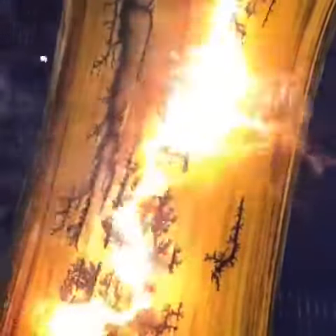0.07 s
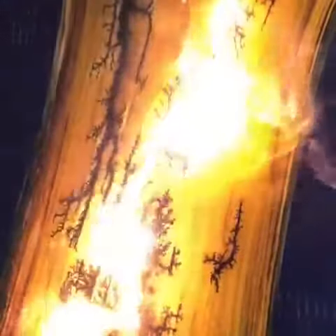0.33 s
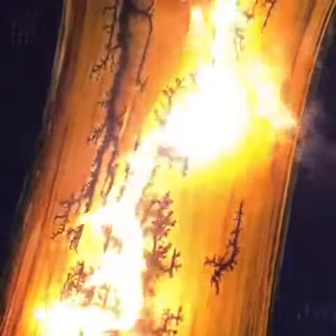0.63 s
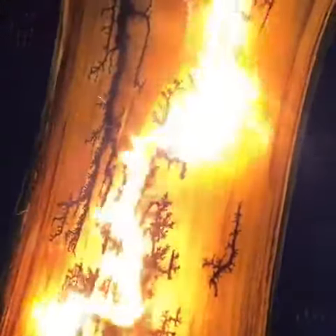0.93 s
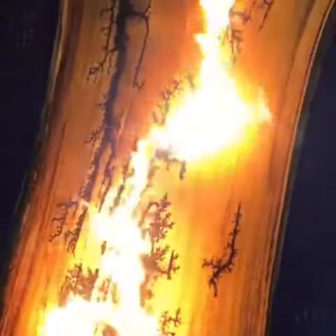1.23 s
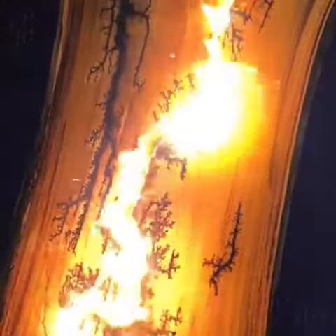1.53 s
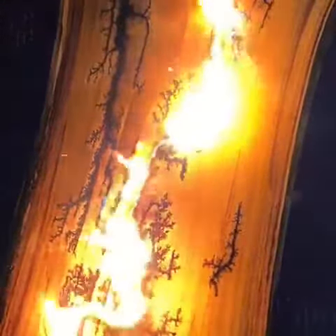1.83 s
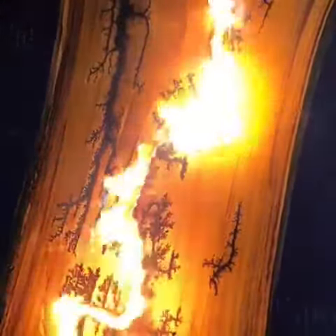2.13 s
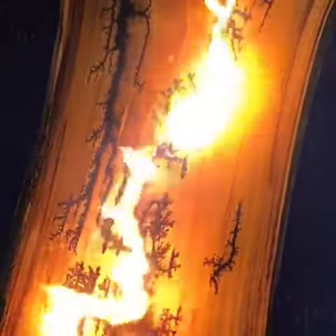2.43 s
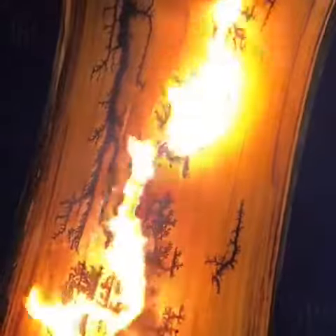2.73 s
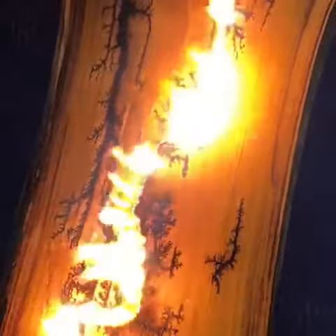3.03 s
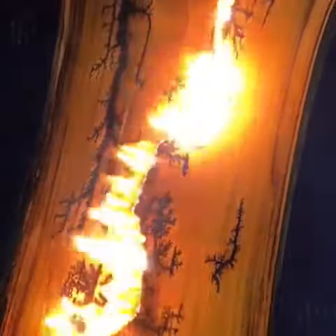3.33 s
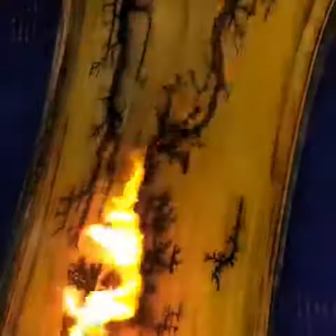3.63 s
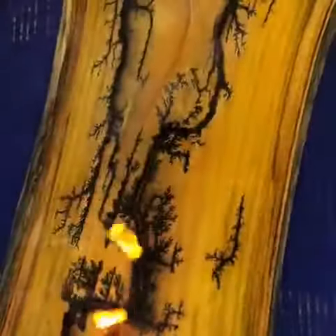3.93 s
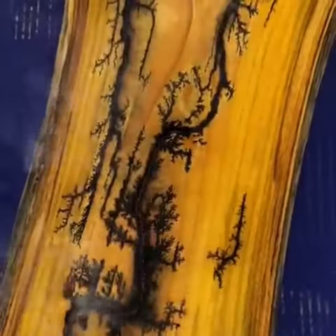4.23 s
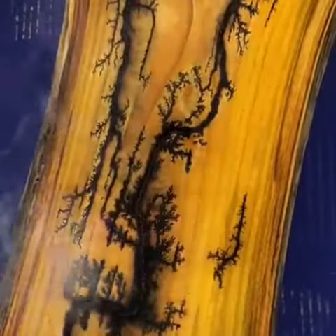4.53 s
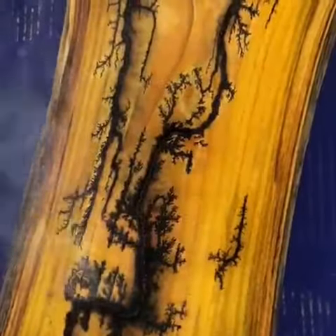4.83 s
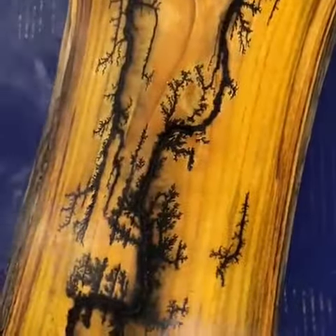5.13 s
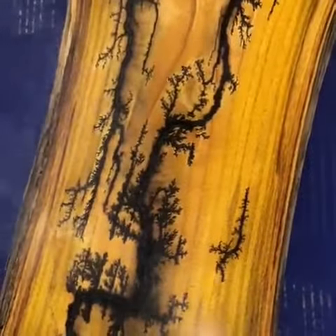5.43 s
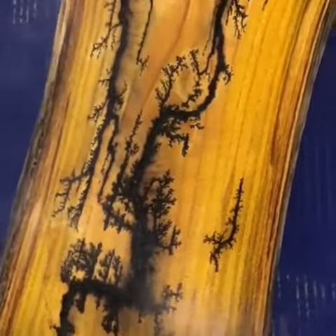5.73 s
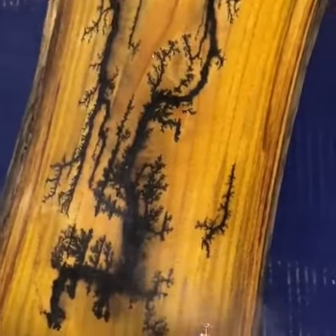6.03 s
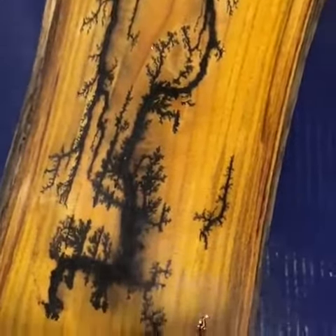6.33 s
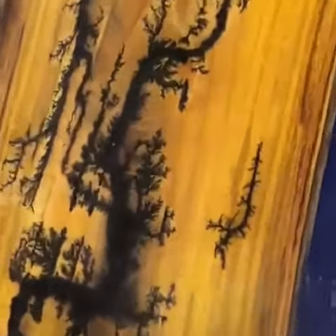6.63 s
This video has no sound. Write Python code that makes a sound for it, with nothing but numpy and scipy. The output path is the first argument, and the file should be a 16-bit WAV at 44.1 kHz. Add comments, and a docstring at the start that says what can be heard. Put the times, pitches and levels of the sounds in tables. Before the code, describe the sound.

An electric arc cracks hard, then settles into a rasping buzz with irregular sharp spikes as it scorches wood near the microphone. A loud snap cuts it off, and a dull knock gives way to steady mains hum. After a low thump, steam spits and fizzes for about a second, then simmers faintly. Low workshop air and a thin fan whine lie underneath.

```python
"""An electric arc, fed by a high-voltage mains transformer, burns along a charred track in a plank close by.
It strikes with a crack once every mains cycle and sizzles in its flame, then blows out with a loud snap.
The transformer hums on idle; then, with a thump and a spit, current finds damp wood and steam hisses.
Low workshop air and the whine of a cooling fan lie underneath."""
import sys
import numpy as np
from scipy import signal
from scipy.fft import rfft, irfft
from scipy.io import wavfile
from scipy.ndimage import uniform_filter1d

SR = 44100
rng = np.random.default_rng(int(sys.argv[2]) if len(sys.argv) > 2 else 0)


def dump(signal):
    """Clip the signal to [-1, 1] and save it as 16-bit WAV at the path in sys.argv[1]."""
    limited = np.clip(np.atleast_2d(signal).T, -1, 1)
    pcm = np.round(limited * 32767).astype(np.int16)
    wavfile.write(sys.argv[1], SR, pcm)


N = 303408
T = np.arange(N) / SR
MAINS_HZ = 49.975
ARC_OUT_S, STEAM_ON_S, STEAM_OFF_S = 3.625, 4.79, 5.88
SOFT_DB, SOFT_PHASE = -20, .732  # a soft strike, and the share of the mains cycle at which it fires

# The arc cracks hard in the cold gap, softens in its flame, then bites into fresh wood in surges:
# t/s, relative level/dB, tilt/(dB per octave)
ARC_CONTOUR = [(0, -11, -3), (0.15, -8.5, -1.8), (0.4, -11, -3.5), (0.52, -22.5, -6.5), (0.72, -21.5, -6.5),
               (1.07, -20, -3.5), (1.5, -19.5, -6), (1.67, -19.5, -0.5), (1.85, -21, -6.5),
               (2.07, -19.5, 1), (2.25, -22, -1.5), (2.45, -18.5, -1.5), (2.56, -21, 2.5), (2.8, -20, -0.5),
               (3.3, -21.5, -0.1), (3.55, -16, -2)]
# Cracks that stand out of the buzz; the last one blows the arc out:
# t/s, relative level/dB, tilt/(dB per octave), spatter/dB
ACCENT_CRACKS = [(0.0363, -9, -0.5, -4), (0.0763, -2, 1.5, 3), (0.1361, -6.5, 1, -9),
                 (0.1958, -8.5, -0.3, -5), (0.2563, -7.5, -4, -4), (0.2958, -4, -2, -1),
                 (1.2953, -13.5, -4, -10), (1.7361, -13, 0, -4), (2.0161, -13, -1.5, -9),
                 (2.1556, -13, 3, -1), (2.2361, -12.5, -4, -3), (2.356, -13, -1, -6),
                 (2.5561, -10, 2.5, -14), (2.5754, -14, 4, -15), (2.636, -11, 1.5, -13),
                 (2.6762, -9.5, 0.5, -5), (2.7167, -11.5, 2.5, -5), (2.8364, -12, -0.3, -9),
                 (3.0369, -8, 0, -5), (3.1363, -14, -1, -4), (3.3766, -12.5, 2.1, -12),
                 (3.4172, -6.5, 0, -4), (3.497, -11.5, -2.5, -8), (3.598, -6.5, 0.5, -9),
                 (3.6196, 3, 0.4, -11)]
def arc_strikes(buzz_gain_db=2, accent_gain_db=1, extra_tilt=.93, size=2048):
    """The gas breaks down once a mains cycle: late, hard and clean, or early, soft and frayed."""
    cycles = np.arange(int(ARC_OUT_S * MAINS_HZ))
    levels, tilts = curve(ARC_CONTOUR, (cycles + SOFT_PHASE) / MAINS_HZ)
    kick, tilt_jitter, spatter_jitter = rng.standard_normal((len(cycles), 3)).T
    force = np.clip(kick - .35 * np.roll(kick, 1), -2, 1)  # hot gas from a hard strike weakens the next
    scatter_db = 1.74 + .65 * cycles / MAINS_HZ  # more uneven as the track burns away
    levels = levels + scatter_db * force
    times = (cycles + breakdown_phase(levels)) / MAINS_HZ
    spatters = -5.5 - 2 * force + 1.6 * spatter_jitter
    buzz = np.column_stack([times, levels + buzz_gain_db, tilts + 1.3 * tilt_jitter, spatters])
    accents = np.array(ACCENT_CRACKS) + [0, accent_gain_db, 0, 0]
    clear_of_accents = np.abs(times[:, None] - accents[:, 0]).min(axis=1) > .5 / MAINS_HZ
    out = np.zeros(N + size)
    for at_s, db, tilt, spatter_db in np.vstack([buzz[clear_of_accents], accents]):
        start = int(at_s * SR)
        out[start:start + size] += amp(db) * crack(tilt + extra_tilt, spatter_db, size)
    return out[size // 8:][:N]


def breakdown_phase(level_db):
    """Share of the mains cycle at which the gas gives way; a harder strike waits for more voltage."""
    return SOFT_PHASE + .0065 * (level_db - SOFT_DB)


# Tone of one strike: f/Hz, gain/dB
CRACK_EQ = [(80, -28), (200, 1), (500, 0), (800, -1.5), (1200, 0.5), (1400, -1.5), (1650, 1.5), (2050, -4),
            (2600, -3), (3700, -7.5), (4800, -8), (6500, -11), (9000, -14), (11000, -19)]
def crack(tilt, spatter_db, size, spatter_s=.003, path_db=1.2):
    """One pressure pulse of unit energy, size / 8 samples in; side branches spatter after it."""
    hz = np.fft.rfftfreq(size, 1 / SR) + 1
    age = np.arange(size) / SR
    # every channel takes a new crooked path, and so has its own colour
    path = np.interp(np.log(hz), np.linspace(np.log(500), np.log(12000), 14), rng.standard_normal(14))
    treble_octaves = np.log2(np.maximum(hz, 1200) / 1200)
    gain = colour(CRACK_EQ, hz) * amp(tilt * treble_octaves + path_db * path) * (hz < SR / 3)
    spatter = rng.standard_normal(size) ** 3 * np.exp(-age / spatter_s)
    branches = 1 + amp(spatter_db) * rfft(spatter) / np.linalg.norm(spatter)
    lag = hz ** (-2j * np.pi * .8)  # each frequency is 0.8 periods late, so lows trail highs
    pulse = np.roll(irfft(gain * branches * lag), size // 8)
    return pulse / np.linalg.norm(pulse)


# Bright fry of the sap: f/Hz, relative level/dB
SIZZLE_EQ = [(500, -20), (1500, -4), (3000, -2), (5000, 2), (8000, 3.5), (11000, 1.5)]
# Dark body of the flame: f/Hz, relative level/dB
FLAME_EQ = [(60, -7), (150, 6), (400, 11.5), (700, 3), (1300, 1), (2000, -2.5), (2900, -1.5), (3700, -13.5),
            (5000, -8.5), (7000, -18.5), (11000, -23)]
def burning(sizzle_db=-50, flame_db=-50.5, tick_db=-66.5, sizzle_s=.0024):
    """Sap sizzles after every strike; the flame rushes, and ticks faintly between strikes."""
    level_db, tilt = curve(ARC_CONTOUR)
    since_strike = (T - breakdown_phase(level_db) / MAINS_HZ) % (1 / MAINS_HZ)
    burst = unit(since_strike / sizzle_s * np.exp(-since_strike / sizzle_s) + .038)
    sizzle = unit(noise(SIZZLE_EQ) * burst * amp(3 * walk(900) + 3.5 * walk(50)))  # grain and flares
    flame = unit(noise(FLAME_EQ) * (1 + 1.3 * burst) * amp(1.8 * walk(30.2)))
    tick = unit(noise(FLAME_EQ) * np.exp(-((since_strike - .0148) / .00054) ** 2))
    sap = sizzle * amp(sizzle_db + 2.15 * tilt)  # louder the brighter the arc
    fire = (flame * amp(flame_db) + tick * amp(tick_db)) * amp(.02 * (level_db - SOFT_DB))
    return (sap + fire) * (1 - switch(ARC_OUT_S + .029, .06))


def embers(per_s=500, spread_db=5, level_db=-56.5):
    """Wood fibres burst in the flame: many tiny woody ticks and a few clear ones."""
    ticks = (rng.random(N) < per_s / SR) * np.sign(rng.standard_normal(N))
    ticks *= amp(spread_db * np.minimum(rng.exponential(size=N), 3.5))
    wood = resonate(ticks, 1860, 900) + resonate(ticks, 2640, 1400)
    return unit(resonate(wood, 2300, 4200)) * amp(level_db) * (1 - switch(ARC_OUT_S, .02))


# The hum's three voices, under the arc, on idle and feeding damp wood: mains harmonic, level/dB
ARC_HUM = [(1, -59.5), (2, -66.5), (4, -52.5), (5, -54.5), (6, -53.5), (8, -66), (9, -50.5), (10, -60),
           (11, -58), (12, -57), (13, -63), (15, -59), (16, -59), (17, -58.5), (18, -59.5), (19, -59.5),
           (20, -80), (21, -57.5)]
IDLE_HUM = [(2, -53), (4, -46), (6, -40.5), (7, -56), (8, -74.5), (9, -76.5), (10, -71), (12, -54),
            (14, -64), (15, -76.5), (16, -49.5), (18, -55.5), (20, -59.5), (22, -63), (24, -76), (25, -79),
            (26, -69), (28, -68), (30, -80)]
DAMP_HUM = [(2, -52), (4, -48.5), (5, -61), (6, -42.5), (7, -60.5), (8, -65), (9, -60), (10, -63),
            (11, -60.5), (12, -53.5), (13, -86), (14, -64), (15, -61.5), (16, -58), (17, -61.5),
            (18, -59.5), (19, -63), (20, -64.5), (21, -74), (22, -64.5), (24, -71), (27, -71), (28, -69.5),
            (29, -68), (33, -74.5), (35, -74), (36, -70.5)]
def transformer(third_arc_db=-39, third_idle_db=-52.5, third_damp_db=-42.5, flame_rise_s=.45):
    """The hum changes its voice with the load; its third harmonic follows the current."""
    idling, damp, unload = switch(3.66, .047), switch(4.84, .039), switch(3.82, .12)
    reload = 1 - np.exp(-np.maximum(T - STEAM_ON_S, 0) / .24)
    current = amp(third_arc_db) * (1 - unload) + amp(third_idle_db) * unload + amp(third_damp_db) * reload
    third = hum([(3, 0)], waver_db=.25, spread_rad=.5) * current
    swell = amp(-13 * np.exp(-T / flame_rise_s))  # the seventh grows as the flame builds up
    seventh = hum([(7, -37.5)], waver_db=.3, spread_rad=1) * swell
    arcing = (hum(ARC_HUM, waver_db=.7, spread_rad=2.03) + seventh) * (1 - switch(ARC_OUT_S, .024))
    idle = hum(IDLE_HUM, waver_db=.3, spread_rad=1.18) * idling * (1 - damp)
    # the boiling track makes the upper harmonics flutter more than the low ones
    boiling = sum(hum([(k, db)], waver_db=min(.12 * k, 2), spread_rad=.98) for k, db in DAMP_HUM)
    return third + arcing + idle + boiling * damp


def hum(harmonics, waver_db, spread_rad):
    """Wavering mains harmonics; a small phase spread lines them up into one tug per cycle."""
    out = np.zeros(N)
    for k, db in harmonics:
        phase = 2 * np.pi * k * MAINS_HZ * T + spread_rad * rng.standard_normal()
        out += np.sqrt(2) * amp(db + waver_db * walk(12)) * np.cos(phase)
    return out


# Low thumps as current surges in: t/s, level/dB, start f/Hz, end f/Hz, decay/s
SURGE_THUMPS = [(4.735, -27.5, 212, 65, 0.019), (4.784, -36, 170, 90, .03)]
def casing_thumps(glide_s=.013):
    """Each surge kicks the transformer casing, which swings a few times with falling pitch."""
    out = np.zeros(N)
    for at_s, db, start_hz, end_hz, decay_s in SURGE_THUMPS:
        age = np.maximum(T - at_s, 0)
        turns = end_hz * age + (start_hz - end_hz) * glide_s * (1 - np.exp(-age / glide_s))
        envelope = np.exp(-age / decay_s) * (1 - np.exp(-age * start_hz))
        out += amp(db) * np.sin(2 * np.pi * turns) * envelope
    return out


# Dull knocks: t/s, level/dB, centre f/Hz, width/Hz, decay/s
LOAD_KNOCKS = [(3.75, -41.5, 1340, 453, 0.016), (3.752, -38.5, 437, 120, 0.037),
               (4.735, -34.5, 249, 250, 0.025)]
def load_knocks():
    """The transformer knocks as the load lets go and takes hold."""
    return bursts(LOAD_KNOCKS)


# Airy fizz of the steam: f/Hz, relative level/dB
STEAM_EQ = [(500, -13), (900, -7), (1500, -3), (2000, -7), (2700, -4), (3500, -1), (5000, 0.5), (7000, 0),
            (11000, -0.5)]
def steam(spurt_db=-46.5, boil_db=-56.5, simmer_db=-58, jet_db=-62, spurt_peak_s=.032):
    """Current boils the damp track: a spurt, a steady fizz with a thin jet until dry, a faint simmer."""
    rise = np.maximum(T - STEAM_ON_S, 0) / spurt_peak_s
    onset = 1 - np.exp(-rise)
    spurt = (rise * np.exp(1 - rise)) ** 2
    boil = onset * (1 - switch(STEAM_OFF_S, .035)) * amp(1.4 * walk(9))
    fizz = unit(noise(STEAM_EQ) * amp(1.6 * walk(1500) + .5 * walk(19)))
    jet = unit(noise_band(N, hz=5800, width_hz=1200))
    flow = amp(spurt_db) * spurt + amp(boil_db) * boil + amp(simmer_db) * onset
    throb = 1 + .14 * np.cos(4 * np.pi * MAINS_HZ * T)  # once each half cycle
    return (fizz * flow + jet * amp(jet_db) * (boil + spurt)) * throb


# Sharp spits and small ticks: t/s, level/dB, centre f/Hz, width/Hz, decay/s
STEAM_SPITS = [(4.7255, -48, 8000, 7000, .001), (4.7315, -37.5, 1580, 900, 0.0021),
               (4.7835, -46, 1900, 1600, 0.0052), (4.7838, -36.5, 3500, 990, 0.0025),
               (4.7838, -31, 7000, 7140, 0.0038), (4.789, -31.5, 5640, 4000, .003),
               (5.779, -42.5, 6000, 7000, .003), (5.829, -44, 6040, 7000, .003)]
def steam_spits():
    """Steam spits as the boil starts and ticks near its end."""
    return bursts(STEAM_SPITS)


# Low bed of workshop air: f/Hz, density/(dB per Hz)
ROOM_TONE = [(20, -92), (32, -100), (44, -71), (70, -77), (125, -79), (270, -80), (420, -82), (600, -82.5),
             (900, -89), (1300, -92), (1800, -93.5), (2700, -96.5), (3600, -103), (5000, -105),
             (8000, -109), (11000, -110)]
def workshop(fan_hz=487, fan_db=-55):
    """Low air noise and the wavering whine of a cooling fan."""
    fan_phase = 2 * np.pi * np.cumsum(fan_hz * (1 + .00234 * walk(5))) / SR
    air = noise(ROOM_TONE) * amp(.68 * walk(6))
    fan = np.sqrt(2) * amp(fan_db + 1.3 * walk(6)) * np.sin(fan_phase)
    return air + fan


def room(x, tail_db, t60_s, predelay_s=.005):
    """The walls add a short faint tail."""
    age = np.arange(SR // 2) / SR
    tail = rng.standard_normal(len(age)) * amp(-60 * age / t60_s) * (age > predelay_s)
    return x + amp(tail_db) * signal.fftconvolve(x, tail / np.linalg.norm(tail))[:N]


def bursts(table):
    """Short decaying rushes of noise, each in its own resonance."""
    out = np.zeros(N)
    age = np.arange(SR // 3) / SR
    for at_s, db, hz, width_hz, decay_s in table:
        ring = noise_band(SR, hz, width_hz)[-len(age):]
        envelope = np.exp(-age / decay_s) * (1 - np.exp(-age * hz))
        start = int(at_s * SR)
        out[start:start + len(age)] += amp(db) * unit(ring * envelope) * np.sqrt(np.mean(envelope ** 2))
    return out


def noise(points):
    """Noise with the given density in dB per Hz."""
    gain = colour(points, np.fft.rfftfreq(N, 1 / SR))
    return irfft(rfft(rng.standard_normal(N)) * gain, N) * np.sqrt(SR / 2)


def noise_band(size, hz, width_hz):
    """White noise passed twice through one resonance."""
    return resonate(resonate(rng.standard_normal(size), hz, width_hz), hz, width_hz)


def resonate(x, hz, width_hz):
    """A two-pole resonance with gain 1 at its centre."""
    return signal.lfilter(*signal.iirpeak(hz, hz / width_hz, fs=SR), x)


def colour(points, hz):
    """Gain of an (f/Hz, level/dB) curve at the given frequencies."""
    f, db = np.transpose(points)
    return amp(np.interp(np.log(hz + 1), np.log(f), db))


def curve(table, t=T):
    """The columns of a table of (t/s, ..) rows at times t."""
    times, *columns = np.transpose(table)
    return [np.interp(t, times, column) for column in columns]


def walk(per_s):
    """Random steps, smoothed twice, with an rms of 1."""
    hold = max(int(SR / per_s), 1)
    steps = np.repeat(rng.standard_normal(N // hold + 1), hold)
    return unit(uniform_filter1d(uniform_filter1d(steps, hold), hold)[:N])


def switch(at_s, over_s):
    """A smooth step from 0 to 1."""
    return .5 + .5 * np.tanh((T - at_s) / over_s)


def unit(x):
    """Scale to an rms of 1."""
    return x / np.sqrt(np.mean(x ** 2))


def amp(db):
    """Decibels to gain."""
    return np.exp(np.asarray(db) * (np.log(10) / 20))


def scene():
    """Arc and flame up front, then transformer, steam and the workshop around them, in mono."""
    arc = room(arc_strikes(), tail_db=-15, t60_s=.25)
    fire = burning() + embers()
    hiss = steam() + steam_spits()
    supply = transformer() + casing_thumps() + load_knocks()
    return (arc + fire + supply + hiss + workshop())[None]


def record(dry):
    """A steep low-pass takes off the top."""
    lowpass = signal.firwin(201, cutoff=11780, fs=SR, window=("kaiser", 9))
    return signal.fftconvolve(dry, lowpass[None], "same")


dry = scene()
out = record(dry)
dump(out)
```